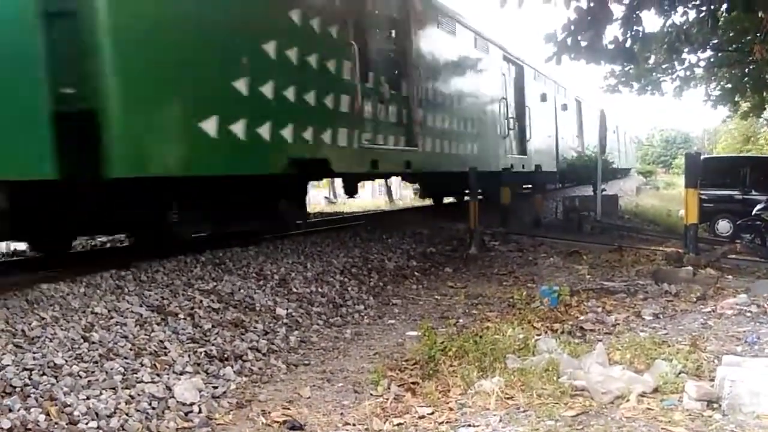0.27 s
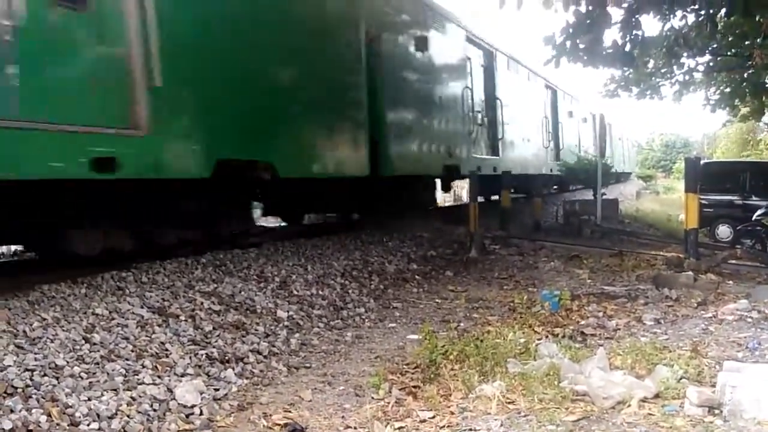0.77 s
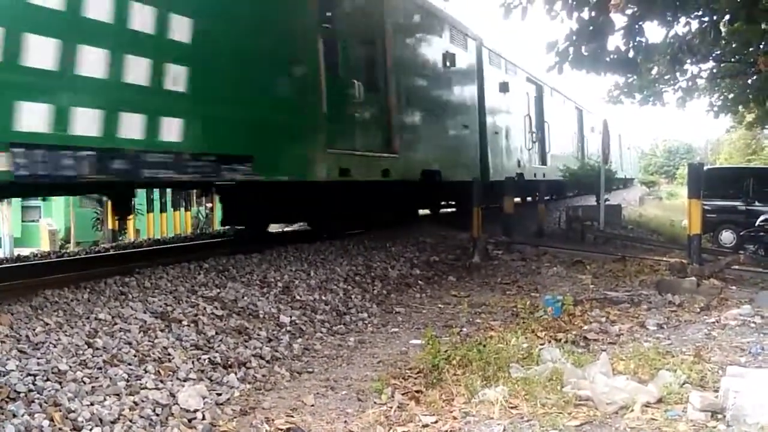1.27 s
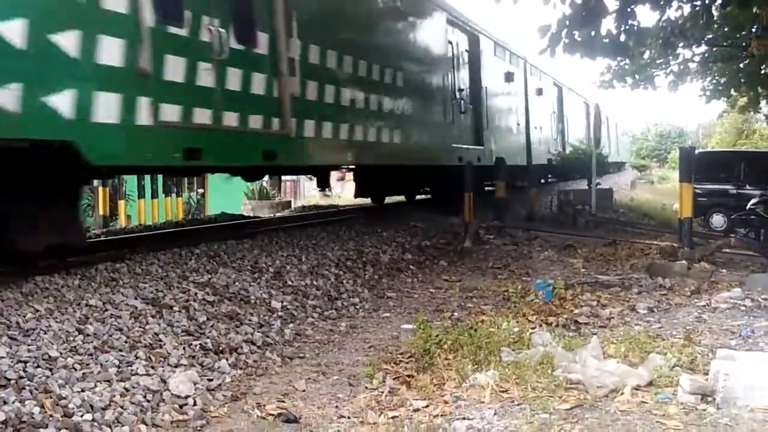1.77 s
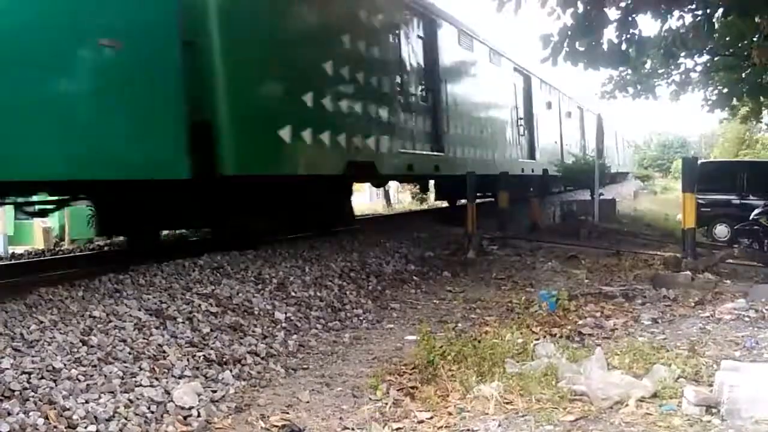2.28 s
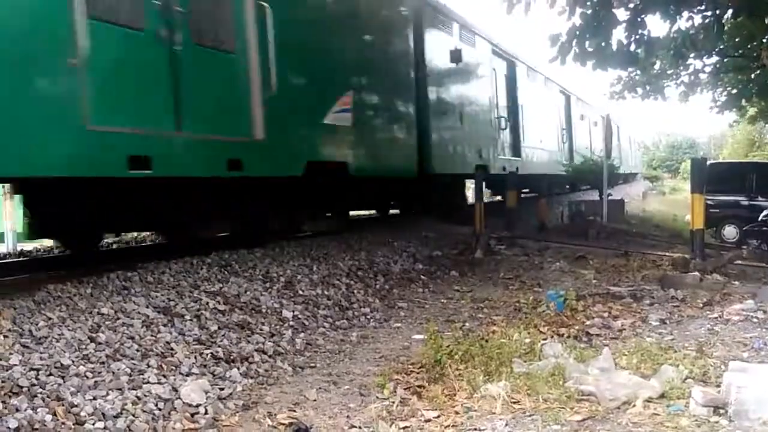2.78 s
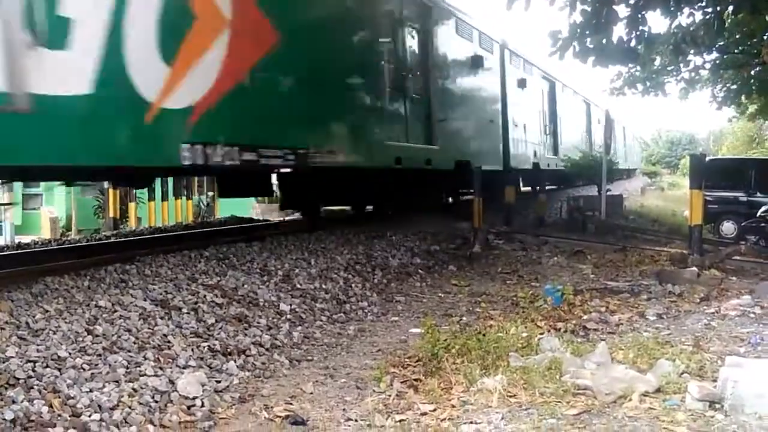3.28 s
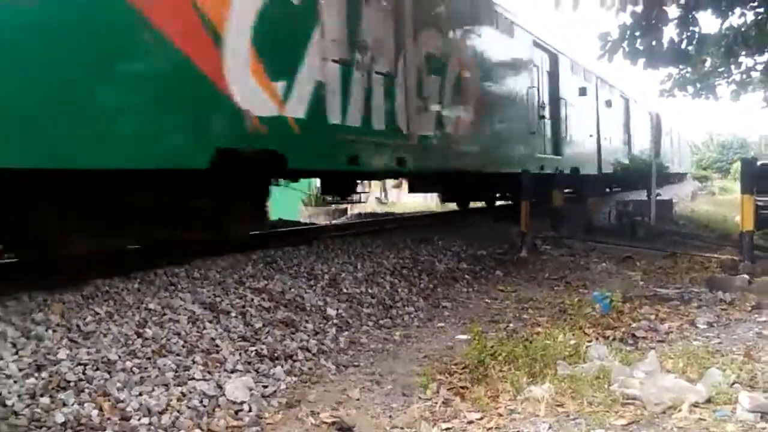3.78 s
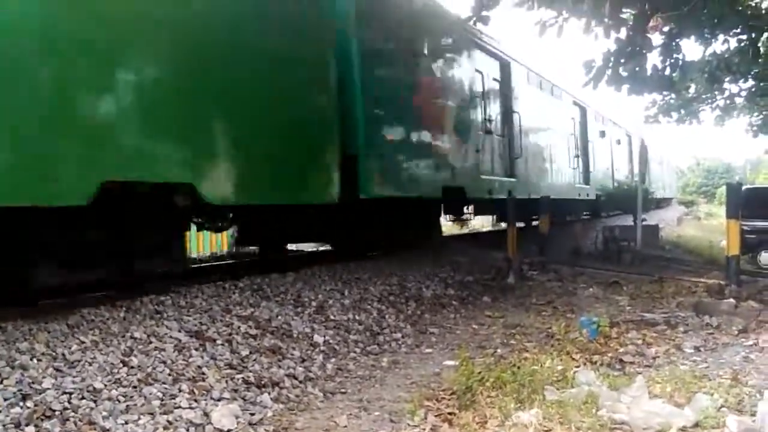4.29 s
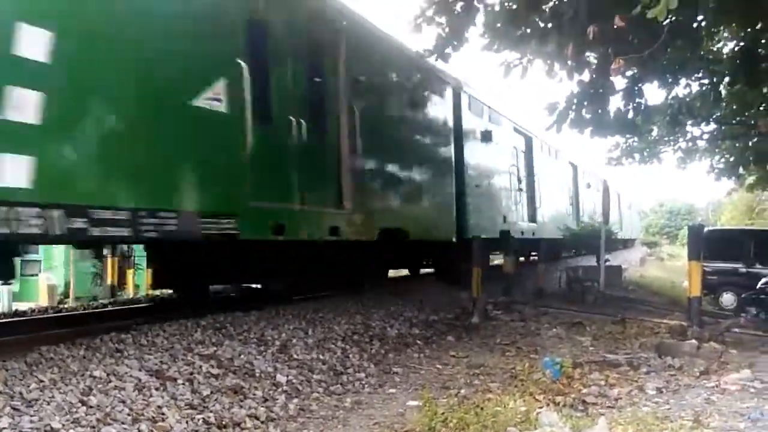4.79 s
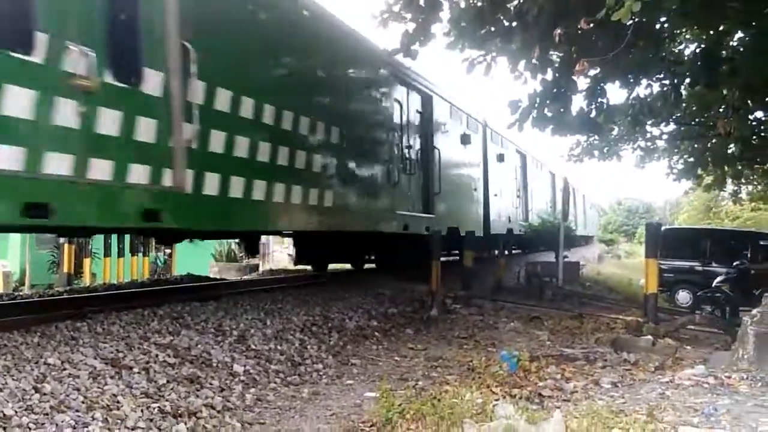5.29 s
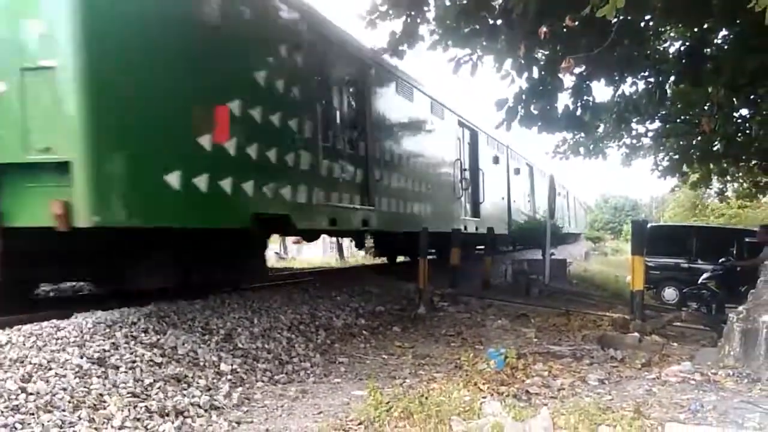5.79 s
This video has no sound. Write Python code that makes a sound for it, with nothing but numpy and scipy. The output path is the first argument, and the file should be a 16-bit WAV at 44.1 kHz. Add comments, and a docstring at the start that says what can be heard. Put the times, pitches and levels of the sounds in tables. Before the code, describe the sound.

A train passes a few metres from a phone near the gravel, outdoors, already rolling at the start and never stopping. A rough steel rumble with loose chatter runs throughout. Faint clacks and dull low thumps come in the first 0.8 s, then a brief lull. Bright hard clacks burst at about 1.0 and 1.2 s, then 1.6 and 1.8, with ringing wheel tones after them. Duller, more distant knocks fill 1.9 to 2.7. Another sharp pair lands at 2.8 and 3.0, then 3.4 and 3.6, where the rolling roar swells. Deep deck thumps and ground booms dominate around 4.0 to 4.2. A last bright pair strikes at 4.65 and 4.85, followed by a smaller one near 5.0 and a hissier roar. Heavy, blunt thuds at 5.2 and 5.4 give way to softer knocks and thinning rattle until 6 s. The loudest blows clip.

```python
"""Coaches over rail joints

Steel coaches roll past a few metres from a phone on the ballast. Wheels clack over rail joints,
near ones loud and bright, far ones faint or dull: noise bands rattle and leave a tail, narrow bands
ring as wheel and rail modes. Soft knocks thump over the crossing deck and shake the ground, a few
wheel modes sing on, and rough rail keeps the steel roaring between blows. The loudest blows clip."""
import sys
import numpy as np
from scipy import signal
from scipy.fft import irfft, next_fast_len
from scipy.io import wavfile
from scipy.ndimage import uniform_filter1d

SR = 44100
rng = np.random.default_rng(int(sys.argv[2]) if len(sys.argv) > 2 else 0)


def to_wav(sig):
    """Store sig (one row per channel, or 1-D mono) as 16-bit WAV at the path in sys.argv[1].

    Samples outside -1..1 are clipped; the rate is SR.
    """
    pcm = np.clip(np.atleast_2d(sig), -1, 1) * 32767
    pcm = np.round(pcm).astype(np.int16)
    wavfile.write(sys.argv[1], SR, pcm.T)  # frames by channels


N = 265878
T = np.arange(N) / SR
STEP = 16  # samples between envelope points
SLOW_RATE = SR / STEP  # envelope points per second
SLOW = T[::STEP]


def undb(db):
    """Amplitude of a level in dB."""
    return 10 ** (np.asarray(db) / 20)


def at(table, hz):
    """Read (Hz, value) points on a log-frequency axis."""
    f, value = np.transpose(table)
    return np.interp(np.log(hz), np.log(f), value)


def blend(rows_db, anchors_hz, hz):
    """Levels given at a few anchor frequencies, read in between."""
    total = 0
    for row_db, weights in zip(rows_db, np.eye(len(rows_db))):
        total = total + at(list(zip(anchors_hz, weights)), hz) * row_db
    return total


def above(table, anchors_hz, hz):
    """dB of a spectrum at hz over the line through its anchors, each raised by 10 log10(Hz)."""
    line = [(f, at(table, f) + 10 * np.log10(f)) for f in anchors_hz]
    return at(table, hz) - at(line, hz)


def unit(x):
    """Scale to rms 1."""
    return x / np.sqrt(np.mean(x ** 2))


def band(hz, width):
    """Fresh noise in a bell-shaped band with steep skirts, rms 1."""
    size = next_fast_len(N)
    f = np.arange(size // 2 + 1) * SR / size
    near = np.abs(f - hz) < 2 * width
    bell = np.exp(-2 * ((f[near] - hz) / width) ** 2)
    bins = np.zeros(len(f), complex)
    bins[near] = (rng.standard_normal((near.sum(), 2)) @ [1, 1j]) * bell
    return unit(irfft(bins, size)[:N])


def walk(rate):
    """Random levels held 1 / rate s and slewed twice, at the envelope rate; spread near 1."""
    hold = int(SLOW_RATE / rate)
    levels = np.repeat(rng.standard_normal(len(SLOW) // hold + 1), hold)
    slewed = uniform_filter1d(uniform_filter1d(levels, hold), hold)
    return 1.3 * slewed[:len(SLOW)]


def add(out, s, x, rate=SR):
    """Lay x into out from s seconds on."""
    i = int(s * rate)
    out[i:i + len(x)] += x[:len(out) - i]


def fall(t, t60, rise_s):
    """Quick rise, exponential fall."""
    return (1 - np.exp(-t / rise_s)) ** 2 * np.exp(-np.log(1000) * t / t60)


def knock(hz, swell_s, turn=0.5):
    """A soft blow: the swing builds up for swell_s, then is choked; envelope peak 1."""
    t = T[:SR // 8]
    swell = t / swell_s
    return swell * np.exp((1 - swell ** 2) / 2) * np.sin(2 * np.pi * hz * t + turn)


# The ground shaken under the phone.
# Each row: start in seconds, envelope peak in dB, pitch in Hz.
BOOMS = [(0.178, -23, 86), (0.559, -21, 98), (0.969, -13, 126), (1.861, -18, 108), (2.073, -23, 119),
         (2.325, -22, 70), (2.479, -23, 71.5), (2.694, -15, 101), (2.873, -15.5, 125), (3.266, -13, 76.6),
         (3.461, -19, 71.5), (3.64, -20, 130), (3.824, -18, 95), (4.019, -13, 78), (4.206, -9.5, 83.5),
         (4.783, -9, 109), (4.97, -12.5, 82), (5.161, -17, 128), (5.359, -14, 72.7), (5.574, -10.5, 62.6),
         (5.703, -21, 94), (5.96, -18.5, 84)]


def ground():
    """Slow heavy swings of the track bed, each building up over 1.3 cycles."""
    out = np.zeros(N)
    for s, db, hz in BOOMS:
        add(out, s, undb(db) * knock(hz, 1.3 / hz, turn=0))
    return out


# Axles on the crossing deck.
# Each row: time in seconds (the knock starts 1 ms before), envelope peak in dB, pitch in Hz.
THUMPS = [(0.004, -8.5, 192), (0.205, -7.5, 210), (0.261, -1, 247), (0.459, -3, 232), (0.643, -10, 210),
          (0.831, -17.5, 143), (0.977, -6, 182), (1.139, -14, 162), (1.168, -4, 236), (1.515, -1.5, 237),
          (1.593, -6, 233), (1.709, -1, 222), (1.764, -12, 165), (1.791, -6.5, 247), (1.884, -9.5, 220),
          (2.077, -7, 246), (2.134, -1, 230), (2.327, -0.5, 232), (2.394, -16, 285), (2.497, -11.5, 202),
          (2.551, -22, 151), (2.695, -10, 151), (2.825, -6, 234), (3.022, -4.5, 228), (3.363, -1, 226),
          (3.439, -5.5, 255), (3.555, -4.5, 197), (3.63, -4.5, 263), (3.72, -8.5, 175), (3.851, -4.5, 142),
          (3.916, -4.5, 205), (3.968, -1, 242), (4.052, -5.5, 194), (4.158, 1, 234.5), (4.24, -7, 190),
          (4.329, -13, 224), (4.521, -16, 233), (4.654, -3.5, 194), (4.816, -5.5, 179), (4.843, -4.5, 226),
          (4.972, -7.5, 248), (5.174, -1, 155), (5.366, -0.5, 223), (5.384, -1.3, 238), (5.531, -8.5, 204),
          (5.721, -5.5, 232), (5.763, -14.5, 250), (5.78, -8, 228), (5.796, -7, 238), (5.982, -16, 205)]


def deck():
    """Each axle knocks the deck, which goes on rumbling; a wall sends the knock back."""
    out, tails = np.zeros(N), np.zeros(N)
    for s, db, hz in THUMPS:
        swell_s = 0.006 * (hz / 220) ** 0.35  # low knocks are single blunt swings
        add(out, s - .001, undb(db) * knock(hz, swell_s))
        add(tails, s + 2 * swell_s, undb(db - 10) * fall(T[:SR // 3], 0.21, swell_s / 2))
    lag = int(0.02425 * SR)  # delay of the wall's echo
    out[lag:] += undb(-15) * out[:-lag]
    rumble = band(214.3, 174) + undb(-15.5) * band(544, 250)
    return out + rumble * tails


# One mode of a passing wheel sings on above the rest.
# Each row: start in seconds, pitch in Hz, level in dB, t60 in seconds before the half-second fade.
SINGING = [(1.01, 3260, -23.5, 0.29), (1.301, 5330, -49, .6), (1.62, 2150, -18, 0.29),
           (1.63, 3700, -36, 0.71), (1.82, 2805, -28, 1.3), (2.07, 2860, -40, 2), (2.22, 1454, -35.5, 1.9),
           (2.6, 2040, -20, 0.14), (2.6, 2390, -24.5, 0.16), (2.86, 2120, -19, 0.55),
           (2.86, 6040, -45.5, 1.1), (3.05, 6040, -54, 1.2), (3.46, 5980, -57, 1.1),
           (4.05, 936, -20.5, 0.22), (4.17, 2270, -29, 0.28), (4.68, 3070, -26, 0.27),
           (4.85, 3330, -23.5, 0.65), (5.17, 3270, -32.5, 0.73), (5.5, 2260, -33.5, 1.5)]


def singing():
    """Each ring is a tight cluster of modes that beats a little, faded out over half a second."""
    out = np.zeros(N)
    t = T[:SR // 2]
    for s, hz, db, t60 in SINGING:
        envelope = fall(t, t60, 0.0011) * np.cos(np.pi * t)
        add(out, s, undb(db) * envelope * band(hz, .05 * hz)[:len(t)])
    return out


def chatter(rate, spread_db, t60):
    """Slack parts of the bogies knock at random, rate times a second; gain on the rolling, rms 1."""
    when, size = rng.random((len(SLOW), 2)).T
    knocks = (when < rate / SLOW_RATE) * undb(-spread_db * np.log(1 - .9 * size))
    decay = fall(SLOW[:SR // STEP // 4], t60, 0.0023)
    return unit(1 + signal.fftconvolve(knocks, decay)[:len(SLOW)])


# Rolling between blows, as relative levels before spectrum and trim.
# Each row: time in seconds, ground in dB, track in dB, wheel in dB, top hiss in dB.
ROLL = [(0.0, -30, -27, -24.5, -63), (0.3, -26.5, -39, -36.5, -66), (0.6, -33, -39, -43.5, -75),
        (0.868, -28, -39, -43.5, -80), (1.04, -30, -32, -31.5, -69), (1.43, -35.5, -36, -38, -72),
        (1.8, -30, -22.5, -24, -67), (1.97, -27.5, -31.5, -34.5, -67), (2.42, -38.5, -32, -37.5, -69),
        (2.68, -28.5, -30, -38, -75), (3.21, -31.5, -32, -29.5, -66), (3.5, -26.5, -22, -33.5, -63),
        (3.65, -17.5, -21, -21.5, -58), (3.95, -30.5, -28, -31.5, -61), (4.4, -24, -25.5, -35, -64),
        (4.62, -24.5, -24.5, -30, -64), (5.02, -26.5, -23.5, -22.5, -55), (5.17, -30.5, -29, -38, -63),
        (5.44, -27.5, -28.5, -31.5, -62), (5.72, -25, -29.5, -43.5, -70), (6.03, -31, -37, -45.5, -65)]
# Where ground, track, wheel, rim and hiss levels apply, in Hz.
ROLL_HZ = [70, 700, 2300, 5800, 11000]


def rolling_levels():
    """Rolling levels in dB at ROLL_HZ; the rim's level rises faster than the wheel's."""
    s, *columns = np.transpose(ROLL)
    ground_db, track_db, wheel_db, hiss_db = [np.interp(SLOW, s, c) for c in columns]
    rim_db = -55 + 1.45 * (wheel_db + 33)
    return [ground_db, track_db, wheel_db, rim_db, hiss_db]


# Steel clacks of wheels over rail joints, near ones loud and bright, far ones faint or dull.
# Each row: time in seconds (the blow starts 2 ms before), relative peak in dB near 2.5 kHz,
# dullness in dB, rattle t60 in seconds at 2.5 kHz.
CLACKS = [(0.055, -8, -3.5, 0.11), (0.176, -14, -2.5, 0.24), (0.2583, -15, 10.5, 0.081),
          (0.4593, -11.5, 11.5, .05), (0.832, -27, 17, .08), (0.968, 4, 0.5, 0.1), (1.1665, 5, 0, 0.053),
          (1.306, -21, 0, 0.1), (1.5126, -18.5, 26.5, 0.018), (1.5908, 5.5, -0.5, 0.082),
          (1.711, -9.5, 2, 0.1), (1.7876, 2.5, 0.5, 0.093), (1.901, -12.5, 0.5, 0.33),
          (2.132, -15, 15, 0.093), (2.198, -16, -1, .11), (2.328, -9, 11, 0.051), (2.603, -21, 5.5, 0.041),
          (2.684, -25, 15, 0.11), (2.827, 5, 0.5, 0.11), (3.0198, 4.5, -1.5, 0.096),
          (3.362, -6.5, 11, 0.032), (3.437, 6, 0, 0.085), (3.6297, 3, -1, 0.066),
          (3.835, -23.5, 13.5, 0.51), (3.9693, -7, 11, .047), (4.055, -22, 11, .068),
          (4.16, -12.5, 15, 0.069), (4.238, -19.5, 6, 0.17), (4.594, -13.5, 8, 0.21), (4.651, 4.5, 0, .1),
          (4.7835, -13, 9, 0.04), (4.8404, 1, 1.5, 0.13), (4.992, -6.5, -2.5, 0.1), (5.038, -15, 1, .24),
          (5.107, -13, -1, 0.21), (5.1734, -12.5, 11, 0.29), (5.365, -12.5, 10.5, 0.21),
          (5.4144, -17, 0.5, .14), (5.56, -18.5, 13, 0.2), (5.594, -35, 25.5, .085),
          (5.7563, -23, 13.5, 0.14), (5.7828, -26, 17, .081), (5.973, -22, 11, 0.14)]
# Where the low, middle and high clack levels apply, in Hz.
CLACK_HZ = [800, 2300, 6000]


def clack_levels():
    """Clack levels in dB at CLACK_HZ; a dull blow gains bass and loses treble."""
    _, mid_db, dull_db, _ = np.transpose(CLACKS)
    low_db = mid_db - 10.5 + 0.86 * dull_db
    high_db = mid_db - 25.5 - 1.85 * dull_db
    return [low_db, mid_db, high_db]


def blows(db, shapes):
    """Envelope of all clacks in one band."""
    out = np.zeros(len(SLOW))
    for row, gain, shape in zip(CLACKS, undb(db), shapes):
        add(out, row[0] - .002, gain * shape, rate=SLOW_RATE)
    return out


# Spectrum of the rattle. Each row: frequency in Hz, relative density in dB per Hz.
RATTLE = [(350, -3.5), (630, -2), (1000, 0), (1500, -5.5), (2300, -1), (3000, -9.5), (3900, -16),
          (4600, -20.5), (7000, -29), (10000, -39.5), (14000, -49), (14600, -56), (16000, -65.5)]
# Spectrum of the rolling roar. Each row: frequency in Hz, relative density in dB per Hz.
ROAR = [(22, -31), (35, -0.5), (70, 3), (185, -1.5), (260, -4.5), (440, -15), (900, -14), (1300, -20),
        (2200, -7.5), (3000, -25), (4500, -41.5), (7500, -47.5), (14000, -52.5), (14600, -74)]
# Tail left by a clack. Each row: frequency in Hz, t60 in seconds.
TAIL_T60 = [(400, 0.2), (1300, 0.19), (2300, 0.22), (5000, 0.63), (8000, 0.19), (13000, 0.56)]
# How much the rolling noise chatters. Each row: frequency in Hz, exponent on the chatter gain.
SLACK_SHARE = [(100, .1), (600, 1.06), (3000, 0.27), (9000, .3)]


def rattle_and_roar(roll_db, clack_db, tail_db, lumps, slack):
    """Third-octave steps of noise: blows rattle and leave a tail, rough rail feeds the same bands."""
    low_db, mid_db, _ = clack_db
    t60s = np.transpose(CLACKS)[3]
    t = SLOW[:SR // STEP]
    # faint blows come from further along the track, smeared by the way
    rise_s = 0.0029 * undb(-.15 * np.maximum(mid_db, low_db))
    # loose parts hit unevenly, in clusters of a few milliseconds
    clusters, swell = undb(1.18 * walk(250)), walk(2.835)
    out = 0
    for hz in 25 * 2 ** np.arange(0, 9.4, 1 / 3):
        width = hz / 4
        rolling_db = blend(roll_db, ROLL_HZ, hz) + above(ROAR, ROLL_HZ, hz) - 3.0
        rolling_db = rolling_db + swell + lumps + 2.65 * walk(17)
        rolling = undb(rolling_db) * slack ** at(SLACK_SHARE, hz)
        hit_db = blend(clack_db, CLACK_HZ, hz) + above(RATTLE, CLACK_HZ, hz) - 2.0
        hit_db = hit_db + 0.52 * rng.standard_normal(len(CLACKS))
        # the treble of a rattle is over sooner
        rattle = fall(t, t60s[:, None] * (hz / 2500) ** -.2, rise_s[:, None])
        tail_gain = undb(tail_db - 5 - 2.0 * np.log2(max(hz / 5000, 1)))
        tail = tail_gain[:, None] * fall(t, at(TAIL_T60, hz), 0.0048)
        hits = clusters * blows(hit_db, rattle) + blows(hit_db, tail)
        hits = hits * (hz > 330)  # the deepest bands only roll
        envelope = np.sqrt(width) * np.hypot(rolling, hits)
        out = out + band(hz, width) * np.interp(T, SLOW, envelope)
    return out


# Clusters of close wheel and rail modes.
# Each row: frequency in Hz, width in Hz, relative level in dB, t60 in seconds.
WHEEL = [(533, 170, -9.5, 0.52), (847, 110, -14, 0.21), (943, 110, -7, 0.31), (1122, 110, -15, 0.56),
         (1420, 70, -14.5, 0.48), (1600, 91, -17.5, 0.29), (1987, 130, -8, 0.22), (2160, 78, -11, 0.18),
         (2274, 130, -4, 0.25), (2470, 120, -8.5, 0.3), (2566, 78, -20, 0.54), (2857, 110, -10.5, 0.61),
         (3026, 120, -6.5, 0.13), (3235, 130, -7.5, 0.33), (3743, 310, -9, 0.53), (4080, 180, -7.5, 0.3),
         (4420, 260, -12, 0.16), (4800, 170, -8, 0.3), (5000, 130, -13, 0.33), (5240, 290, -16.5, 0.54),
         (5980, 350, -7.5, 0.33), (7150, 200, -20, 0.5), (8200, 250, -21.5, 0.5)]


def wheel_and_rail_ring(roll_db, clack_db, tail_db, lumps, slack):
    """Narrow noise bands stand for clusters of modes, rung by clacks and kept going by rolling."""
    t = SLOW[:SR // STEP]
    out = 0
    for hz, width, mode_db, t60 in WHEEL:
        # every wheel shares its blow out differently
        hit_db = blend(clack_db, CLACK_HZ, hz) + tail_db - 4.5
        hit_db = hit_db + 3.36 * rng.standard_normal(len(CLACKS))
        flutter = undb(2.4 * walk(45))
        ring = blows(hit_db, [fall(t, t60, 0.0023)] * len(CLACKS)) * flutter
        # the rolling ring comes and goes
        rolling = undb(blend(roll_db, ROLL_HZ, hz) - 5.5 + 3.7 * walk(12) + lumps) * slack
        envelope = undb(mode_db) * np.hypot(rolling, ring)
        out = out + band(hz, width) * np.interp(T, SLOW, envelope)
    return out


def steel():
    """Wheels and rail: rattle, roar and ring share their blows, unevenness and chatter."""
    roll_db, clack_db = rolling_levels(), clack_levels()
    tail_db = -8.5 - 0.024 * clack_db[1]  # far, faint blows are wetter
    lumps = 2.0 * walk(40)  # dB
    slack = chatter(rate=30, spread_db=3.4, t60=0.055)
    shared = roll_db, clack_db, tail_db, lumps, slack
    return rattle_and_roar(*shared) + wheel_and_rail_ring(*shared)


def scene():
    """Ground, deck, singing wheels and steel in one channel."""
    return (ground() + deck() + singing() + steel())[None]


def record(dry):
    """The microphone loses the deepest bass; the loudest blows clip near full scale.

    The treble steps down near 14.6 kHz and ends near 15.7 kHz."""
    mic = signal.sosfilt(signal.butter(2, 35, "highpass", fs=SR, output="sos"), dry)
    clipped = np.clip(mic, -.97, .97)
    dull = signal.sosfilt(signal.cheby2(4, 12, 14600, fs=SR, output="sos"), clipped)
    return signal.sosfilt(signal.ellip(8, .2, 70, 15690, fs=SR, output="sos"), dull)


dry = scene()
out = record(dry)
to_wav(out)
```